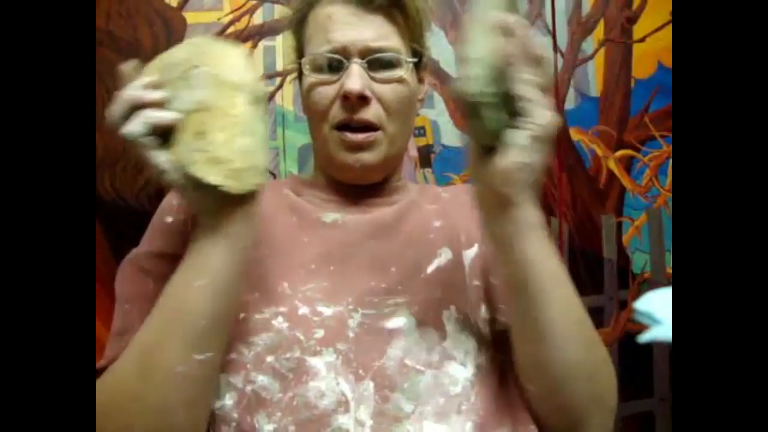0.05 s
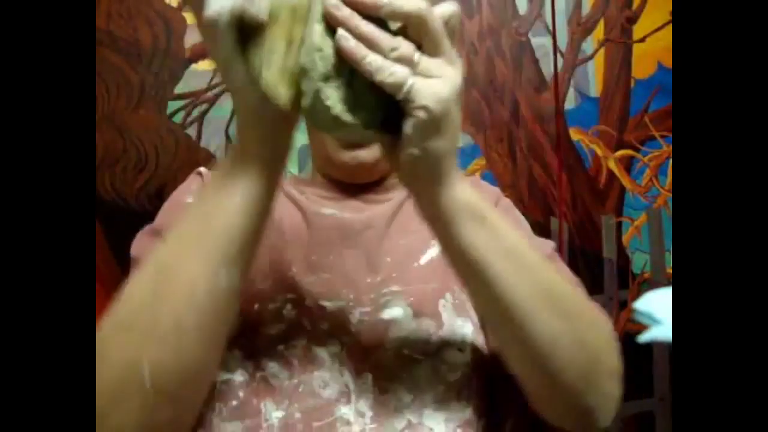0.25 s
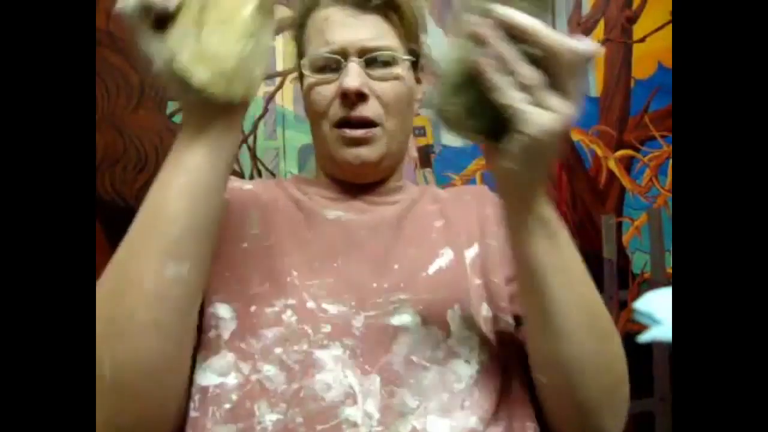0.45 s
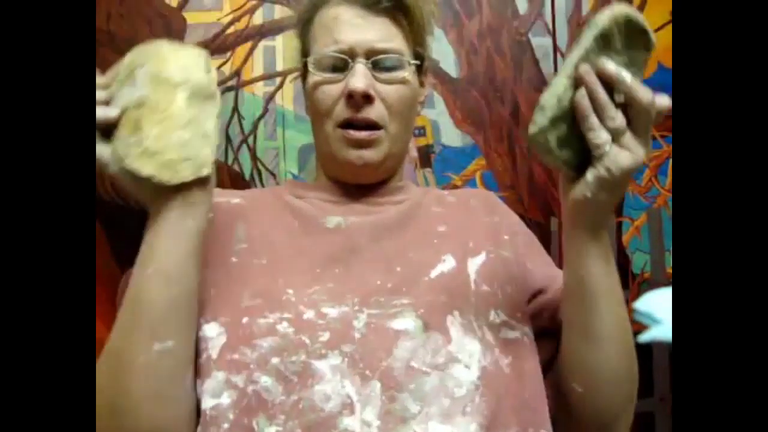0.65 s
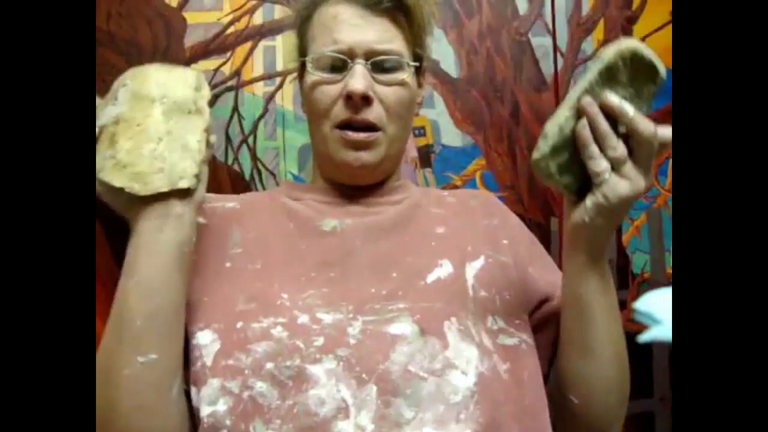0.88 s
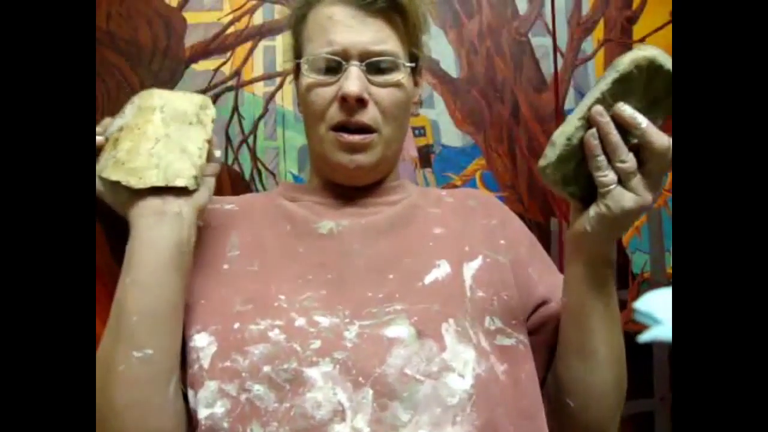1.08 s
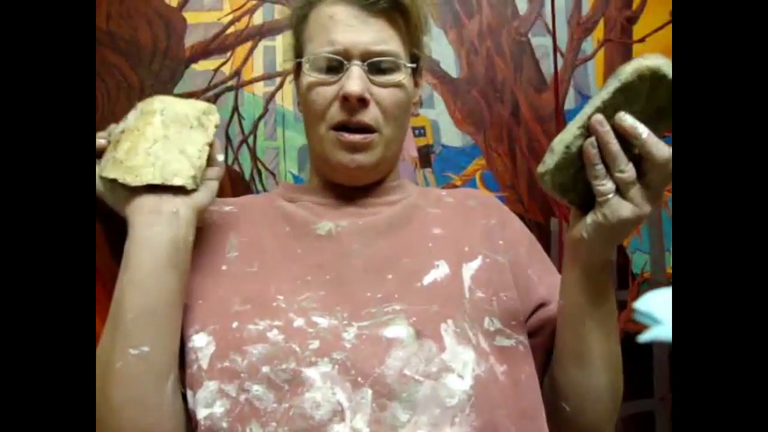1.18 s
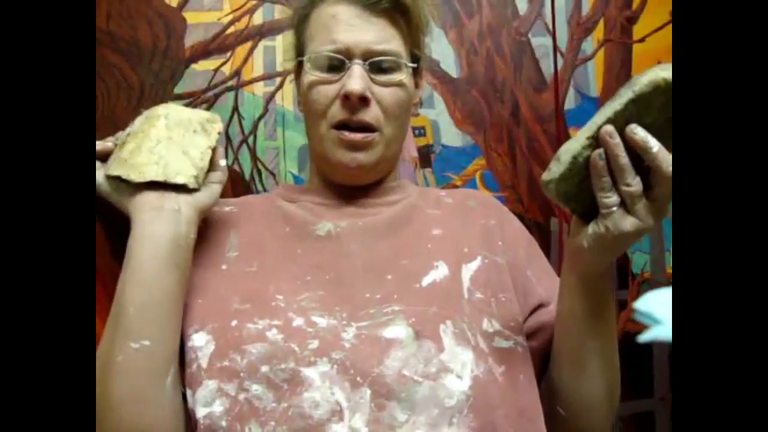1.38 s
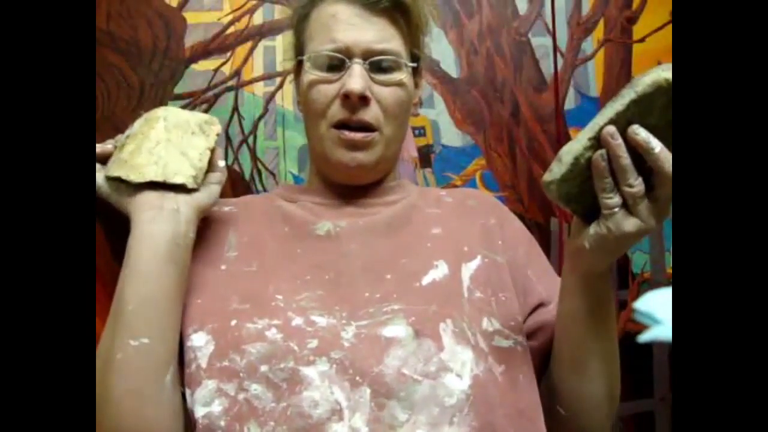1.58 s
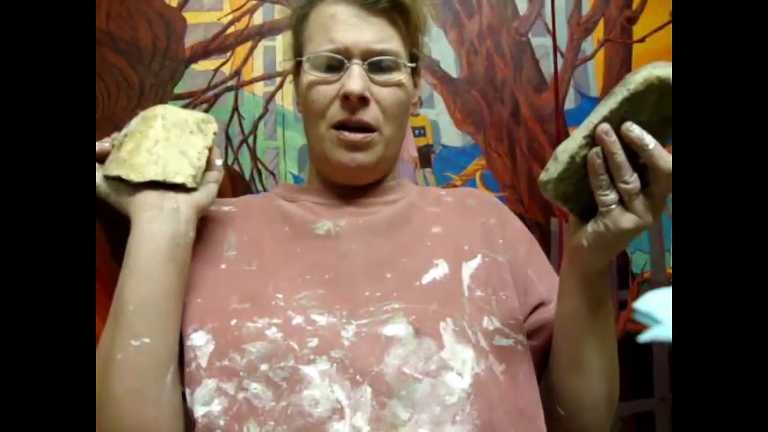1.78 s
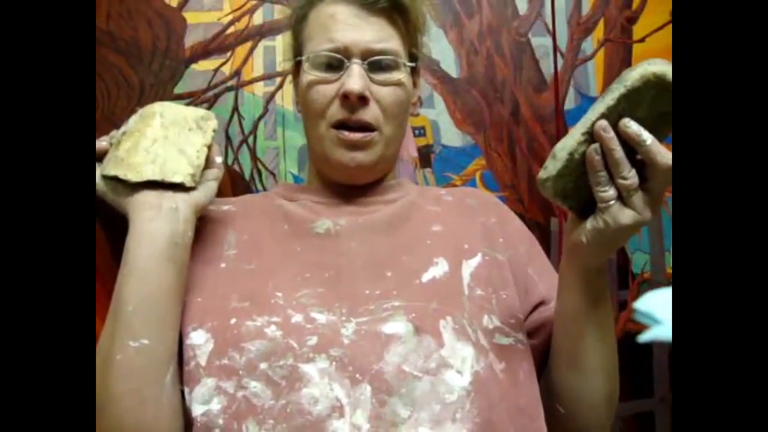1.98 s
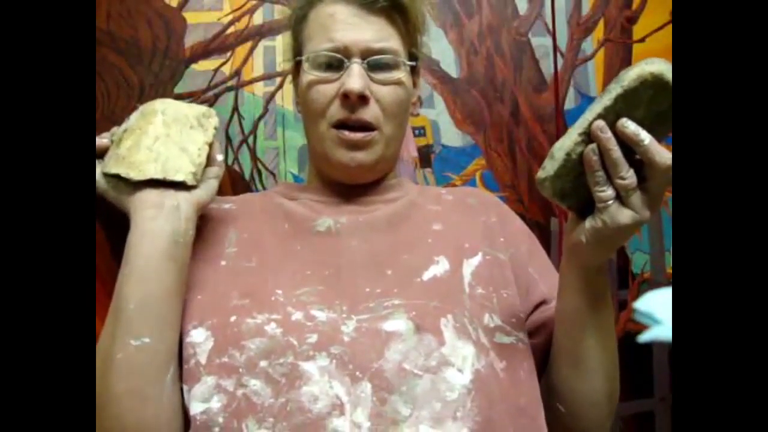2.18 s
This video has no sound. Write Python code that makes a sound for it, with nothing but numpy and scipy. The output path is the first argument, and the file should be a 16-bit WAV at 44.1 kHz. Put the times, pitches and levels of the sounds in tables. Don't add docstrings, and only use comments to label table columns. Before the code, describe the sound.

One sharp rock-on-rock clack. Quiet ventilation hum and hiss until about 0.24 s, when two hand-held stones knock together, loud, dry and close, with a tiny gritty edge and bright stony ring. Clustered wall echoes follow within a tenth of a second, then a dense mid-pitched tail fades by about 0.7 s. The hum, pushed down by the knock, creeps back until 2.2 s under steady hiss.

```python
import sys
import numpy as np
from scipy import signal
from scipy.io import wavfile
from scipy.ndimage import uniform_filter1d

SR = 44100
rng = np.random.default_rng(int(sys.argv[2]) if len(sys.argv) > 2 else 0)


def attenuation_scalar(level_db):
    decades = np.asarray(level_db, float) / 20
    return 10 ** decades


def materialize(psi):
    bounded = np.clip(np.atleast_2d(psi).T, -1, 1)
    quanta = np.round(bounded * 32767).astype(np.int16)
    wavfile.write(sys.argv[1], SR, quanta)


N = 99225
T = np.arange(N) / SR
KNOCK_S = .2417

# arrival_s, signed strength (ratio)
ECHOES = [(.2485, -.25), (.2516, -.65), (.2555, .4), (.2568, 1.2), (.2583, .7), (.2647, -.4), (.2679, -.4),
          (.2720, .3), (.2760, .4), (.2850, .3), (.2866, 1.25), (.2881, .65), (.2962, -.4), (.3022, -.35),
          (.3031, .45), (.3043, .5), (.3295, -.25), (.3395, .15), (.3455, -.25), (.3537, .4), (.3675, .2)]


def evened(x):
    return x / np.sqrt(np.mean(x ** 2) + 1e-20)


def read(points, hz):
    f, value = np.transpose(points)
    return np.interp(np.log(hz + 1), np.log(f + 1), value)


def shaped(x, db_of, size):
    overlap = size * 3 // 4
    hz, t, z = signal.stft(x, SR, nperseg=size, noverlap=overlap)
    z = z * attenuation_scalar(db_of(hz[:, None], t))
    return signal.istft(z, SR, nperseg=size, noverlap=overlap)[1][:len(x)]


def band(low_hz, high_hz):
    return signal.butter(2, [low_hz, high_hz], "band", fs=SR, output="sos")


def swell(top_hz):
    wobble = np.zeros(N)
    for rate_hz in np.geomspace(top_hz / 20, top_hz, num=20):
        wobble += np.sin(2 * np.pi * (rate_hz * T + rng.random())) / np.sqrt(rate_hz)
    return evened(wobble)


def hush():
    duck_db, ahead_s, hold_s = -18.5, .009, .01
    t = T - KNOCK_S
    ducked = (t > -ahead_s) & (t < hold_s)
    return attenuation_scalar(uniform_filter1d(duck_db * ducked, size=60))


def hiss():
    # pitch_hz, level_db (per Hz)
    hiss_colour = [(25, -13.5), (300, -10), (1500, -0.5), (5000, -3), (9900, -3.5), (10300, -17.5),
                   (15700, -17)]
    hiss_db, patchy_db = -59.5, 1.63
    whine_hz, whine_db = 8050, -79.5
    patches = rng.standard_normal((513, N // 256 + 9))
    patches = uniform_filter1d(patches, size=14, axis=0)
    patches = evened(uniform_filter1d(patches, size=3, axis=1))

    def colour(hz, t):
        return read(hiss_colour, hz) + patchy_db * patches[:, :len(t)]

    noise = evened(shaped(rng.standard_normal(N), colour, size=1024))
    whine = attenuation_scalar(whine_db) * np.sin(2 * np.pi * whine_hz * T)
    return attenuation_scalar(hiss_db + 0.54 * swell(top_hz=60)) * noise + whine


def hum():
    # pitch_hz, level_db (per Hz)
    hum_colour = [(18, -45), (30, -20.5), (153, -7.5), (284, -2), (323, -4.5), (588, -2.5), (669, -6.5),
                  (811, -3), (5000, -16.5), (6500, -50.5), (11000, -120)]
    # pitch_hz, width_hz, level_db
    fan = [(588.6, 12, -72.5), (820.5, 14, -79), (1010, 8.02, -77)]
    hum_db, rolloff_hz = -59, 1525

    def colour(hz, t):
        return read(hum_colour, hz) - 20 * np.log10(1 + (hz / rolloff_hz) ** 2) + 0 * t

    level = attenuation_scalar(hum_db + 1.1 * swell(top_hz=98.4))
    air = level * evened(shaped(rng.standard_normal(N), colour, size=2048))
    for hz, width_hz, db in fan:
        r = np.exp(-np.pi * width_hz / SR)
        poles = [1, -2 * r * np.cos(2 * np.pi * hz / SR), r * r]
        air = air + attenuation_scalar(db) * evened(signal.lfilter([1], poles, rng.standard_normal(N)))
    return air


def linger():
    # pitch_hz, level_db, t60_s
    standing = [(740, -30, .33), (876, -33, .4), (1430, -29, .36), (1790, -33, .33), (1972, -17, .36),
                (2036, -21, .32), (2172, -27, .33), (2848, -25.5, .3), (4655, -29.5, .3),
                (4797, -28.5, 0.39), (4866, -22.5, .27)]
    rise_s = 0.015
    t = np.maximum(T - KNOCK_S, 0)
    tones = np.zeros(N)
    for hz, db, t60 in standing:
        level = attenuation_scalar(db - 60 * t / t60 + 3 * swell(top_hz=49.7))
        tones += level * np.sin(2 * np.pi * (hz * t + rng.random()))
    return tones * np.minimum(t / rise_s, 1)


def clusters():
    scatter, scatter_s = .6, .0015
    return 1 + scatter * sum(abs(g) * np.exp(-((T - s) / scatter_s) ** 2) for s, g in ECHOES)


def tail(colour_points):
    # pitch_hz, t60_s
    decay = [(60, .3), (250, 0.35), (600, .5), (1300, 0.45), (2000, .42), (3000, 0.35), (4800, .28),
             (6600, 0.25), (9000, 0.35), (14000, .33), (15700, 0.32)]
    rise_s, hold_s, patchy_db = 0.0025, .065, 1.5
    slots = np.arange(0, N - 12, 12)
    at = slots + rng.integers(0, 12, len(slots))
    taps = np.zeros(N)
    taps[at] = rng.standard_normal(len(at))
    lumps = evened(uniform_filter1d(rng.standard_normal(N), size=150))

    def steady(hz, t):
        return read(colour_points, hz) + 0 * t

    def fading(hz, t):
        return steady(hz, t) - 60 * np.maximum(t - KNOCK_S - hold_s, 0) / read(decay, hz)

    wash = shaped(taps, fading, size=512) / np.std(shaped(taps, steady, size=512))
    rise = np.clip((T - KNOCK_S) / rise_s, 0, 1)
    return wash * rise * clusters() * attenuation_scalar(patchy_db * lumps)


def reverberation(ring):
    # pitch_hz, level_db
    pulse_colour = [(60, -17), (300, -25.5), (480, -19), (800, -11), (1300, -3), (2050, 0.5), (4200, -8),
                    (5500, -21), (8000, -23.5), (15000, -23)]
    # pitch_hz, level_db
    ring_colour = [(2000, -2.5), (4500, 0), (5000, 2.5), (6000, -6), (7200, -6), (14000, -1)]
    pulse_db, ring_db = -18, -24.5
    rung = signal.fftconvolve(tail(ring_colour), ring / np.linalg.norm(ring))[:N]
    return attenuation_scalar(pulse_db) * tail(pulse_colour) + attenuation_scalar(ring_db) * rung


def spike(s, strength):
    offset = np.arange(N) - s * SR
    return strength * np.sinc(offset) * (abs(offset) < 30)


def lead_in():
    lead_db, growth_s = -13, .0012
    t = T - KNOCK_S
    rush = attenuation_scalar(lead_db) * rng.standard_normal(N) * np.exp(np.minimum(t, 0) / growth_s) * (t < 0)
    return signal.sosfilt(band(1000, 7500), rush)


def clack():
    # pitch_hz, level_db, t60_s
    stone = [(2040, -25, 0.023), (2870, -20.5, .015), (4656, -11.5, 0.022), (4875, -14, 0.041),
             (6515, -19, 0.017), (6600, -13.5, .035), (6950, -19.5, 0.016), (9990, -24.5, .008),
             (14600, -30, 0.0094)]
    contact_s, rebound = .00045, .15
    t = np.arange(SR // 10) / SR
    u = t / contact_s
    pull = -np.sin(np.pi * np.clip(u, 0, 1))
    pulse = pull + rebound * np.sin(np.pi * np.clip(2 * (u - 1), 0, 1))
    ring = sum(attenuation_scalar(db - 60 * t / t60) * np.sin(2 * np.pi * hz * t) for hz, db, t60 in stone)
    return pulse, ring * np.minimum(u, 1)


def knock(pulse, ring):
    knock_db, echo_ring = 2, .2
    echoes = sum(spike(s, strength) for s, strength in ECHOES)
    dull = signal.sosfiltfilt(band(850, 14000), echoes)
    direct = signal.fftconvolve(spike(KNOCK_S, 0.91), pulse + ring)[:N]
    echoed_pulse = signal.fftconvolve(dull, pulse)[:N]
    echoed_ring = signal.fftconvolve(echo_ring * echoes, ring)[:N]
    return attenuation_scalar(knock_db) * (direct + echoed_pulse + echoed_ring)


def microphone(x):
    # pitch_hz, level_db
    port = [(30, -18.5), (120, -7.5), (300, -2.5), (700, 0), (10500, 0), (12200, -6), (13200, 1.5),
            (14600, 4), (15700, 0.5)]
    hz = np.linspace(0, SR / 2, num=513)
    response = signal.firwin2(2047, hz, attenuation_scalar(2 * read(port, hz)), fs=SR)
    return signal.fftconvolve(x, signal.minimum_phase(response))[:N]


def rocks():
    pulse, ring = clack()
    return microphone(knock(pulse, ring) + lead_in() + reverberation(ring) + linger())


def scene():
    # time_s, level_db
    gain = [
        (0, -4.5),
        (0.242, -3),
        (.3, -14.5),
        (.72, -16),
        (.8, -8),
        (1.1, -6.5),
        (1.45, -3.5),
        (1.8, -.5),
        (2.25, .5),
    ]
    s, db = np.transpose(gain)
    knocking = rocks()
    floor = hum() * hush() * attenuation_scalar(np.interp(T, s, db))
    return (knocking + floor)[None]


def top_cut(x):
    return signal.sosfilt(signal.butter(12, 16810, fs=SR, output="sos"), x)


def record(dry):
    edge_hz = 15780
    x = np.clip(dry + hush() * hiss(), -.96, .96)
    low_pass = signal.firwin(801, edge_hz, window=("kaiser", 9), fs=SR)
    x = signal.oaconvolve(x, low_pass[None], "same")
    return top_cut(x)


dry = scene()
out = record(dry)
materialize(out)
```